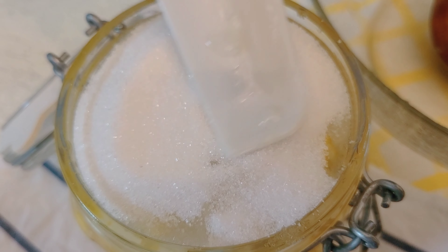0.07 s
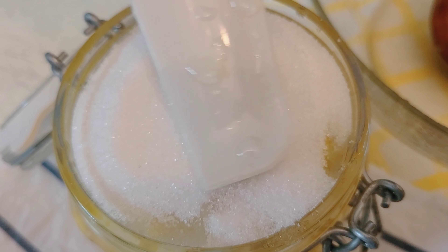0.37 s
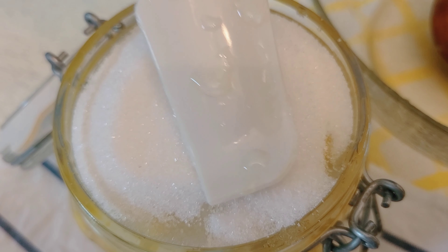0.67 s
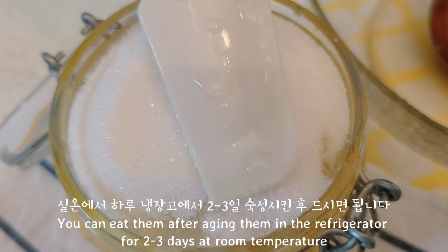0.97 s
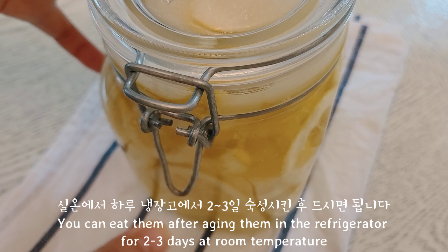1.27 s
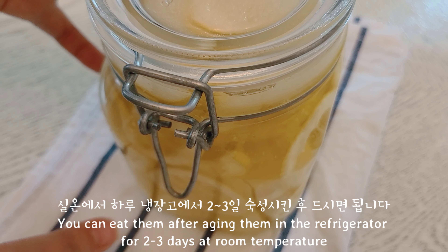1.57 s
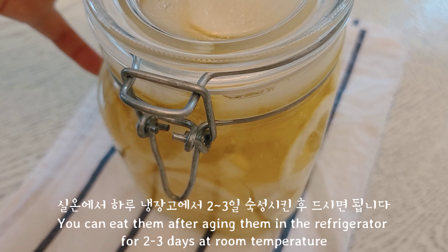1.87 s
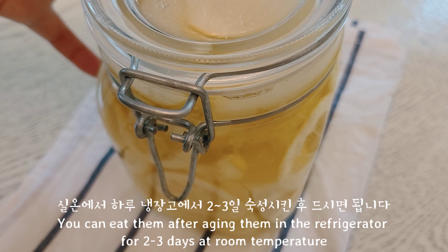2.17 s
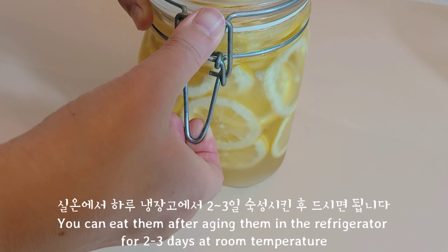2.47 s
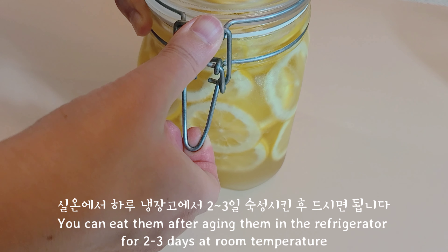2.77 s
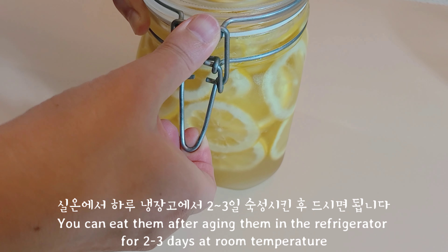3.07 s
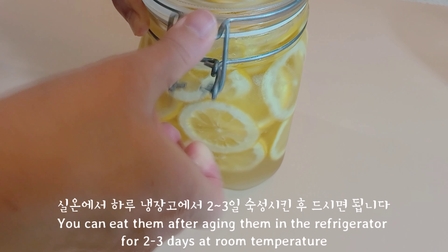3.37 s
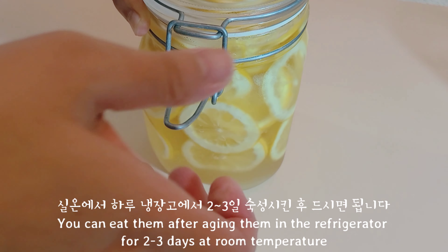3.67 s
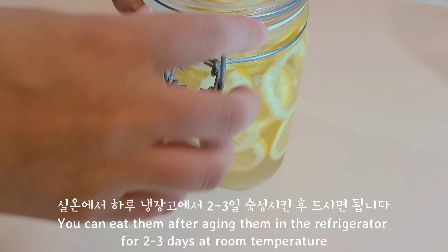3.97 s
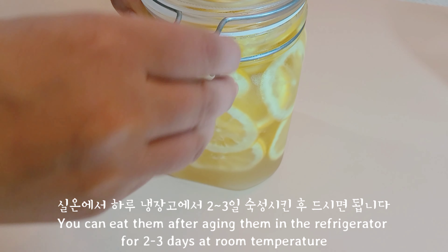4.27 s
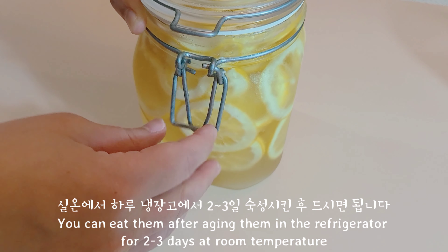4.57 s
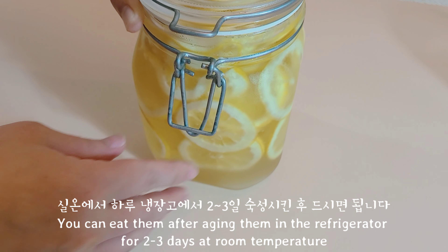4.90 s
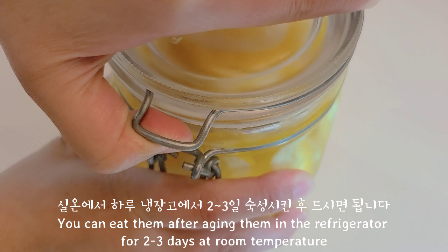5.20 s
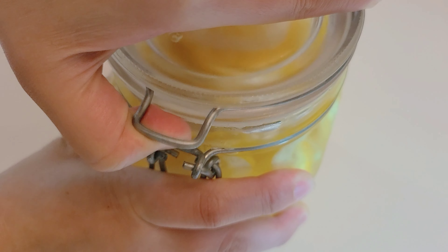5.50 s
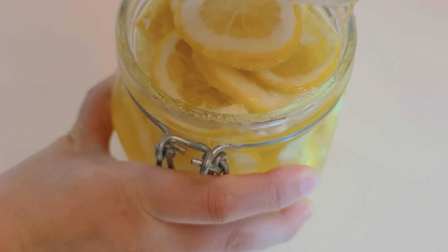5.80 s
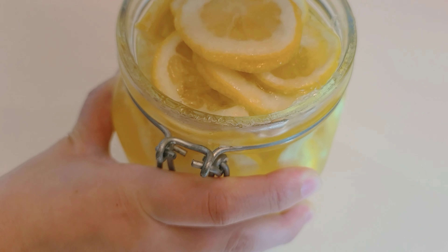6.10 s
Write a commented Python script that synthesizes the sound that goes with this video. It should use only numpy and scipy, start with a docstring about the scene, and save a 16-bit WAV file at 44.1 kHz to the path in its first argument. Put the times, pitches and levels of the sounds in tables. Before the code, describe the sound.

A glass jar's wire clasp snaps shut, springs open and jingles, then the lid pops off over a faint hum.

```python
"""A wire clasp snaps shut on a full swing-top glass jar, close up on a kitchen counter. Later it springs
open and dangles against the glass, each contact ringing the wire and knocking the jar. The rubber seal
peels in tiny snaps, air rushes in as the lid pops off, and the jar rocks to rest with dull thuds.
A small room answers each click, over faint scrapes, soft ventilation and a mains hum."""
import sys
import numpy as np
from scipy import signal
from scipy.fft import rfft, irfft, next_fast_len
from scipy.io import wavfile

SR = 44100
rng = np.random.default_rng(int(sys.argv[2]) if len(sys.argv) > 2 else 0)


def int16_out(signal):
    """Quantize to a 16-bit WAV file."""
    q = np.round(np.clip(np.atleast_2d(signal).T, -1, 1) * 32767)
    wavfile.write(sys.argv[1], SR, q.astype(np.int16))


N = 270774
T = np.arange(N) / SR
RING_T = T[:SR // 2]  # half a second for a hit to ring out


def clasp(wire_db=-28, jar_db=-8.0, knock_s=0.0046, touches=4):
    """Each contact cracks, rebounds, rings the wire and knocks the jar; tension changes both tones."""
    # Wire contacts. Each row: start in seconds, click in dB, tension from 0 to 1, brightness in dB per
    # octave, knock in dB, knock hardness in dB per octave, wire ring in dB, room send in dB.
    contacts = [(1.3122, -22, 0.97, -1.5, -17.5, -0.5, -2, -6.5), (1.3166, -11, .85, -0.5, -25.5, 0, 1, -2),
                (3.4155, -23, 0.07, -3, -26, 0, 3, -4.5), (3.4250, -14, 0.06, 0, -19.5, -1, 1.5, -7.5),
                (4.2015, -53, 0.23, 2.5, -53.5, 4, -.5, -3.5), (4.2277, -62, 0.05, -9, -61, 4.5, 17.5, -6),
                (4.2284, -56, 0.2, 2, -69.5, 4, -5.5, -10), (4.248, -68, .1, -3, -70, 3, 0, -10),
                (4.5978, -30.5, .05, 0, -50, -3.5, 4.5, -8), (4.6008, -42.5, .05, 1.5, -39, -6, 4, -10),
                (4.609, -47.5, 0.15, -1.5, -34, -8, 3, -11), (4.6452, -43, 0.03, -1, -64, -2, -9, -15),
                (5.5692, -21, .1, -1.5, -21, 0.5, -7, -9.5),
                (5.5843, -26, 0.83, -2, -34.5, 0.5, -14, -21.5),
                (5.5889, -22, .7, -1.5, -39.5, 0.5, -16, -26),
                (5.5995, -29.5, .8, -3, -39.5, -2, -12.5, -17), (5.6838, -52, .1, -8, -62, 5, -2, -2),
                (5.6980, -50, .1, -2.5, -65, 2, -4, -2), (5.7085, -52, 0.06, -3, -66, -3, -4, -4.5)]
    # Wire modes. Each row: pitch in Hz, taut level in dB, slack level in dB, t60 in seconds.
    wire_modes = [(1728, -9, -5, .18), (1790, -2, -7, .19), (1878, -2, 2, .17), (1943, -8, -1, .18),
                  (2164, -8, 0, .2), (2724, -13, -4, .14), (2880, -14, -6, .15), (3009, -14, -5, .18),
                  (3467, -18, -6, .2), (3950, -14, 4, .05), (4999, -3, -15, .22), (5190, -4, -15, .27),
                  (5595, -2, -8, .22), (5810, -4, 0, .11), (10110, -7, -14, .08), (10720, -6, -10, .08)]
    # Jar modes. Each row: pitch in Hz and level in dB when clamped, the same when open, t60 in seconds.
    jar_modes = [(186, -9, 175, -4, .13), (222, -13, 248, -1, .15), (294, -1, 280, -9, .17),
                 (382, -6, 345, -2, .14), (425, -6, 430, -13, .15), (480, -4, 522, -4, .15),
                 (571, -4, 576, -8, .16), (890, -3, 748, -8, .09), (966, -1, 850, -11, .08),
                 (1340, -15, 1040, -15, .1), (1502, -13, 1475, -18, .12)]
    # Tone of the crack on taut and on slack wire. Each row: frequency in Hz, relative level in dB.
    taut_tone = [(350, -25), (700, -13.5), (1000, 1), (1300, -5.5), (1850, -1), (2700, -7), (3600, -12),
                 (5200, 5), (7900, -10), (9200, -5), (10900, 4), (13000, -9), (16000, -9.5)]
    slack_tone = [(350, -20), (750, -2.5), (1000, -4.5), (1300, -10), (1900, 1.5), (2600, -2.5),
                  (3400, -4.5), (4000, -1.5), (4700, -6), (5800, 2), (7500, -3), (10500, 2.5), (12500, -3),
                  (16000, -5)]
    # Tone of the dull knock. Each row: frequency in Hz, relative level in dB when clamped and when open.
    knock_tone = [(80, -26, -16), (180, -10, -5), (330, -1, -1), (500, 0, -3), (700, -12, -2), (950, 1, -5),
                  (1200, -9, -17), (1500, -11, -18), (2200, -24, -30)]
    direct, send = np.zeros((2, N))
    for start, click_db, tension, bright_db, blow_db, hard_db, ring_db, room_db in contacts:
        def between(slack, taut):
            return slack + tension * (taut - slack)

        # slack wire chatters longer and rebounds later and louder
        chatter_s, rebound_s, rebound_db = between(.0045, .0026), between(.0065, .004), between(-7.5, -13.5)
        chatter = np.zeros(len(RING_T))
        for k in range(touches):
            add(chatter, k * rebound_s, undb(k * rebound_db) * burst(chatter_s))
        slack_crack = colour(chatter, tilted(slack_tone, bright_db))
        taut_crack = colour(chatter, tilted(taut_tone, bright_db))
        # a dull contact favours the low modes; the wire rings on most when no finger damps it
        wire = [(hz, between(slack, taut), t60) for hz, taut, slack, t60 in wire_modes]
        click = undb(wire_db + ring_db) * ring(tilted(wire, bright_db, pivot_hz=2474), loose=0.76)
        click += between(slack_crack, taut_crack)
        jar = [(row[0], row[1], row[4]) if tension > .5 else row[2:] for row in jar_modes]
        knock = undb(jar_db) * ring(tilted(jar, hard_db, pivot_hz=298))
        body = [(hz, between(opened, clamped)) for hz, clamped, opened in knock_tone]
        thump = colour(burst(knock_s), tilted(body, hard_db))
        add(knock, 0, undb(between(-6, 0.5)) * thump)
        hit = undb(click_db) * click + undb(blow_db) * knock
        add(direct, start, hit)
        add(send, start, hit * undb(room_db))
    return direct, send


def pop(start_s=5.5683, cavity_hz=170.3, db=0.34, t60=0.054, opening_s=0.0027, bend_hz=42, bend_s=0.0071):
    """Suction builds as the gap opens, then the air in the jar swings for a few cycles."""
    out = np.zeros(N)
    # the cavity starts sharp and settles as the pressure evens out
    turns = np.cumsum(cavity_hz + bend_hz * np.exp(-RING_T / bend_s)) / SR
    swell = (1 - np.exp(-RING_T / opening_s)) ** 2 * np.exp(-np.log(1000) * RING_T / t60)
    add(out, start_s, -undb(db) * swell * np.sin(2 * np.pi * turns))
    return out


def seal(peel_s=5.473, tear_s=5.5675, grains_per_s=2000, spread_db=3, snap_s=0.00057):
    """Sticky rubber creeps in a stream of tiny snaps, then swells as it tears free."""
    # Larger snaps. Each row: start in seconds, level in dB.
    snaps = [(5.477, -36), (5.4828, -34), (5.488, -31), (5.5095, -34), (5.5170, -33), (5.541, -38),
             (5.5530, -24), (5.5643, -19.5)]
    # Tone of the rubber. Each row: frequency in Hz, relative level in dB.
    rubber_tone = [(250, -12), (800, -6.5), (1200, -9), (1800, -4.5), (2600, -5), (3800, -3), (6000, -1.5),
                   (8000, -3), (11500, 1), (16000, -7.5)]
    creep_db, sag_db_per_s, tear_db = -40, -53, -21.5
    attack_s, rise_s, release_s = .004, 0.0074, 0.002
    grains = (rng.random(N) < grains_per_s / SR) * rng.choice([-1, 1], N)
    sizes = undb(spread_db * np.minimum(rng.exponential(size=N), 3))
    peeled_s = np.maximum(T - peel_s, 0)
    creep = undb(creep_db + sag_db_per_s * peeled_s) * np.minimum(peeled_s / attack_s, 1)
    tear = undb(tear_db) * np.exp(np.minimum(T - tear_s, 0) / rise_s)
    release = np.exp(-np.maximum(T - tear_s, 0) / release_s)
    tearing = unit(grains * sizes) * (creep + tear) * release
    for start, db in snaps:
        add(tearing, start, undb(db) * burst(snap_s))
    return colour(tearing, rubber_tone)


def lid(free_s=5.5705, lid_db=-35, rush_db=-24.0, rise_s=0.0074, fall_s=0.0055):
    """Air hisses through the widening gap, and the freed glass lid rings."""
    # Tone of the inrushing air. Each row: frequency in Hz, relative level in dB.
    rush_tone = [(250, -14), (500, -2.5), (850, 2), (1200, -7), (1500, 2), (1850, -6), (2550, 2),
                 (3100, -7), (5000, -25), (9000, -45)]
    # Lid modes. Each row: pitch in Hz, level in dB, t60 in seconds.
    lid_modes = [(860, -2, .05), (1012, -4, .05), (1475, -7, .035), (1841, -6, .05), (2500, 2, .035),
                 (2580, -2, .03), (2740, -6, .035), (4646, -6, .07), (5093, -5, .07)]
    swell = np.exp(np.minimum(T - free_s, 0) / rise_s - np.maximum(T - free_s, 0) / fall_s)
    out = undb(rush_db) * colour(swell * rng.standard_normal(N), rush_tone)
    add(out, free_s, undb(lid_db) * ring(lid_modes, loose=0.62))
    return out


def counter():
    """The heavy jar pushes the worktop and rocks to rest; a longer push gives a duller thud."""
    # Worktop modes. Each row: pitch in Hz, level in dB, t60 in seconds.
    worktop_modes = [(37, -27.5, 1), (45.95, -5, 0.24), (62, -4.5, 0.15), (83, -1.5, 0.076),
                     (144, -3, 0.16), (172, -2, 0.16), (257, -7, 0.13), (340, -15.5, 0.068)]
    # Bumps of the jar. Each row: start in seconds, level in dB, push length in seconds.
    bumps = [(1.317, -40, 0.0022), (1.337, -52.5, 0.0053), (3.4252, -21, 0.002), (3.4589, -30, 0.0054),
             (3.4784, -36, 0.0031), (5.588, -14.5, 0.0029), (5.645, -21, 0.005), (5.671, -29, 0.0043),
             (5.698, -29, 0.0028)]
    out, worktop = np.zeros(N), ring(worktop_modes)
    for start, db, push_s in bumps:
        push = np.sin(np.pi * np.minimum(RING_T / push_s, 1))
        add(out, start, undb(db) * signal.fftconvolve(worktop, push / push.sum())[:SR])
    return out


def hands(rumble_hz=38, grain_db=2, grains_per_s=70):
    """Light, gritty scrapes and the low rumble of handling."""
    # A spatula in the sugar, the wire over the lid, hands on the jar. Each row: midpoint in seconds,
    # length in seconds, level in dB, centre in Hz, bandwidth as a fraction of the centre.
    scrapes = [(.11, .16, -81, 5000, .6), (.46, .16, -80.5, 5500, 1), (.82, .12, -82, 5500, .8),
               (1.16, .18, -79, 8500, .9), (1.195, .16, -75, 5150, .07), (1.17, .16, -70, 1800, .8),
               (2.15, .9, -82.5, 5300, .8), (4.59, .03, -62, 4500, 1), (5.17, .44, -83.5, 6500, .8),
               (5.675, .15, -60, 2350, .4)]
    # Hands shift the jar and the counter rumbles. Each row: midpoint and length in seconds, level in dB.
    shifts = [(1.02, 0.28, -62), (1.428, 0.2, -57), (2.803, 0.42, -58)]
    out = np.zeros(N)
    for middle, length_s, db, hz, width in scrapes:
        add(out, middle - length_s / 2, undb(db) * rub(length_s, hz, width))
    grit = rng.standard_normal(2048)
    out *= undb(grain_db * np.interp(T * grains_per_s, np.arange(len(grit)), grit))
    for middle, length_s, db in shifts:
        add(out, middle - length_s / 2, undb(db) * rub(length_s, rumble_hz, width=0.27))
    return out


def room(x, low_t60=0.29, high_t60=0.22, split_hz=6500, first_s=0.0032):
    """Small hard room whose treble dies first."""
    noise = diffuse(len(RING_T))
    low = signal.sosfiltfilt(signal.butter(1, split_hz, fs=SR, output="sos"), noise)
    tail = low * undb(-60 * RING_T / low_t60) + (noise - low) * undb(-60 * RING_T / high_t60)
    tail *= RING_T > first_s
    return signal.oaconvolve(x[None], tail / np.sqrt(np.sum(tail ** 2) / 2), axes=1)[:, :N]


def ventilation(trim_db=2.0):
    """A low bed of moving air that swells and sinks."""
    # Fader ride. Each row: time in seconds, level in dB before the trim.
    ride = [(0.0, -57.5), (1.02, -57), (1.8, -63), (2.12, -59), (3.38, -57), (3.85, -61.5), (5.49, -59),
            (5.63, -50), (5.8, -61.5), (6.14, -62.5)]
    # Tone of the air. Each row: frequency in Hz, relative level in dB.
    air_tone = [(12, -43), (20, -11), (68, -12.5), (113, -3), (198, -1.5), (241, -4.5), (285, -10),
                (357, -6), (399, -11), (873, -28), (1000, -35.5), (1860, -35), (3950, -43.5), (14700, -48),
                (16000, -55)]
    air = np.array([colour(channel, air_tone) for channel in diffuse(N)])
    return undb(trim_db) * fader(ride) * air


def rustle(rest_db=-80.5, fade_s=0.079):
    """A faint midrange rustle that comes and goes."""
    # Louder stretches. Each row: start in seconds, end in seconds, level in dB.
    stretches = [(-.1, 1.284, -70.5), (1.698, 2.48, -74.5), (2.552, 3.453, -77), (4.963, 5.415, -75.5)]
    # Tone of the rustle. Each row: frequency in Hz, relative level in dB.
    rustle_tone = [(200, -12), (500, 6), (1100, -3), (2000, -1.5), (3500, -13), (5500, -23), (9000, -34.5),
                   (15000, -24)]
    gain = undb(rest_db)
    for start, end, db in stretches:
        fade = np.clip(np.minimum(T - start, end - T) / fade_s, 0, 1)
        gain = np.maximum(gain, undb(db) * fade)
    return gain * np.array([colour(channel, rustle_tone) for channel in diffuse(N)])


def mains_hum(hz=120, harmonics_db=(0, -16, -23), step_s=2.637, rise_s=0.084):
    """An appliance hums on three harmonics and steps up in level partway through."""
    # Two fader rides, before and after the step. Each row: time in seconds, level in dB.
    rides = [
        [(0.0, -57), (0.99, -57.5), (1.68, -66.5), (2.58, -63)],
        [(2.88, -50), (4.05, -56), (5.62, -52.5), (6.14, -56)],
    ]
    faint, strong = map(fader, rides)
    gain = faint + (strong - faint) * np.clip((T - step_s) / rise_s, 0, 1)
    return gain * sum(undb(db) * np.sqrt(2) * np.sin(2 * np.pi * (hz * k * T + rng.random()))
                      for k, db in enumerate(harmonics_db, 1))


def ring(modes, loose=0):
    """Decaying sines; a loose strike meets each mode with its own phase and strength."""
    hz, db, t60 = np.transpose(modes)[..., None]
    phase, strength = loose * rng.uniform(-.5, 0.42, (2, len(hz), 1))
    fade = np.exp(-np.log(1000) * RING_T / t60)
    swing = np.sin(2 * np.pi * (hz * RING_T + phase))
    return np.sum(undb(db) * (1 + strength) * fade * swing, axis=0)


def burst(decay_s):
    """Dense, fast-dying rattle of a contact, with its energy spread evenly over all frequencies."""
    fade = np.exp(-RING_T[:4096] / decay_s)
    rattle = rng.standard_normal(len(fade)) * fade
    for _ in range(2):
        flat = irfft(np.exp(1j * np.angle(rfft(rattle))))
        rattle = flat * np.sqrt(fade)
    return rattle * np.linalg.norm(fade) / np.linalg.norm(rattle)


def rub(length_s, centre_hz, width):
    """A soft swell of friction noise around one resonance."""
    swell = np.hanning(int(length_s * SR))
    band = signal.iirpeak(centre_hz, 1 / width, fs=SR)
    noise = rng.standard_normal(len(swell))
    return swell * unit(signal.lfilter(*band, signal.lfilter(*band, noise)))


def diffuse(size, wide_hz=850):
    """Stereo noise from all around: alike in the bass, unrelated in the treble."""
    padded = next_fast_len(size, True)
    hz = np.fft.rfftfreq(padded, 1 / SR)
    likeness = .98 * np.exp(-(hz / wide_hz) ** 2)
    mid, side = rfft(rng.standard_normal((2, padded)))
    mid, side = mid * np.sqrt((1 + likeness) / 2), side * np.sqrt((1 - likeness) / 2)
    return irfft(np.array([mid + side, mid - side]), padded)[:, :size]


def near(x, balance, lag_s, lag_top_hz=1050, scatter_s=.0016, scatter_hz=2400, count=90):
    """Close stereo image: bass reaches the left first; treble takes its own short detours to each side."""
    size = next_fast_len(N + SR // 10, True)
    hz = np.fft.rfftfreq(size, 1 / SR)
    knots = np.linspace(0, SR / 2, count)
    detours = scatter_s * rng.random((2, count)) * (knots > scatter_hz)
    delay = np.array([np.interp(hz, knots, side) for side in detours])
    delay[1] += lag_s * (hz < lag_top_hz)
    turns = np.cumsum(delay, axis=1) * hz[1]  # group delay summed into phase
    lean_db = np.interp(hz, *np.transpose(balance)) / 2
    return irfft(rfft(x, size) * undb([lean_db, -lean_db]) * np.exp(-2j * np.pi * turns), size)[:, :N]


def colour(x, points):
    """Minimum-phase EQ of unit energy through (Hz, dB) points."""
    hz, db = np.transpose(points)
    grid = np.fft.rfftfreq(4096, 1 / SR) + 1
    cepstrum = irfft(np.log(undb(np.interp(np.log(grid), np.log(hz), db))))
    half = len(cepstrum) // 2
    cepstrum[1:half] *= 2
    cepstrum[half + 1:] = 0
    response = irfft(np.exp(rfft(cepstrum)))
    return signal.oaconvolve(x, response / np.linalg.norm(response))[:len(x)]


def tilted(points, db_per_octave, pivot_hz=5000):
    """A spectrum or a set of modes made brighter or duller."""
    return [(hz, db + db_per_octave * np.log2(hz / pivot_hz), *rest) for hz, db, *rest in points]


def fader(points):
    """Gain that glides through (seconds, dB) points."""
    return undb(np.interp(T, *np.transpose(points)))


def add(track, start_s, sound):
    """Mix a sound into a track from a given time on."""
    start = int(start_s * SR)
    track[..., start:start + sound.shape[-1]] += sound[..., :N - start]


def undb(db):
    return 10 ** (np.asarray(db) / 20)


def unit(x):
    return x / np.sqrt(np.mean(x ** 2))


def scene(seal_room_db=-8, lid_room_db=-13, thud_room_db=-19):
    """The jar close by, the room's answer and the kitchen background."""
    # Stereo lean of the clasp, and of the lid with the other close sounds.
    # Each row: frequency in Hz, left minus right in dB.
    clasp_balance = [(60, 0.0), (110, 0), (200, 0.5), (380, -8), (700, 0.5), (1290, -1), (2380, -1),
                     (4400, -3), (8120, -2), (11000, 6), (15000, 7)]
    lid_balance = [(60, 0.0), (300, 0), (1000, 4.5), (2600, 4.5), (5000, -1), (9000, 2), (15000, 6)]
    clicks, send = clasp()
    peel, rush = seal(), lid()
    thuds = pop() + counter() + hands()
    send += undb(seal_room_db) * peel + undb(lid_room_db) * rush + undb(thud_room_db) * thuds
    direct = near(clicks, clasp_balance, lag_s=.00026)
    direct += near(peel + rush + thuds, lid_balance, lag_s=.0003)
    return direct + room(send) + ventilation() + rustle() + mains_hum()


def record(dry, low_cut_hz=36, top_hz=15900):
    """The microphone drops the deepest bass and the very top."""
    dry = signal.sosfilt(signal.butter(2, low_cut_hz, "high", fs=SR, output="sos"), dry)
    return signal.sosfilt(signal.ellip(8, .2, 70, top_hz, fs=SR, output="sos"), dry)


dry = scene()
out = record(dry)
int16_out(out)
```